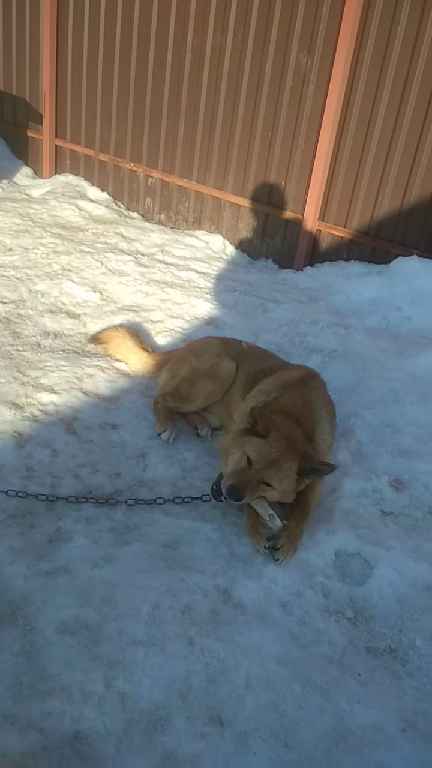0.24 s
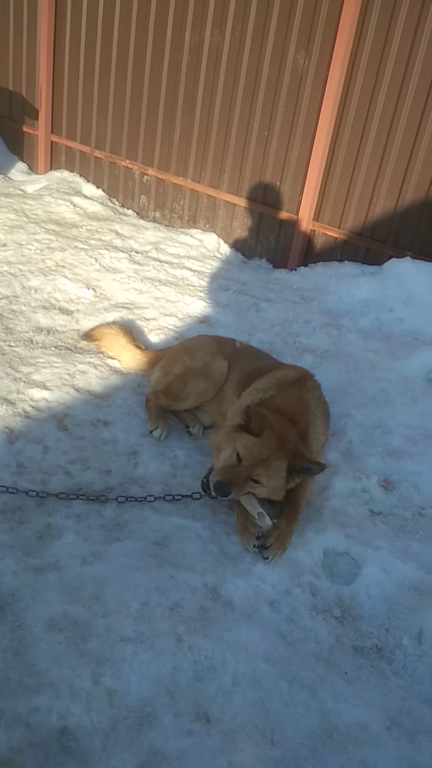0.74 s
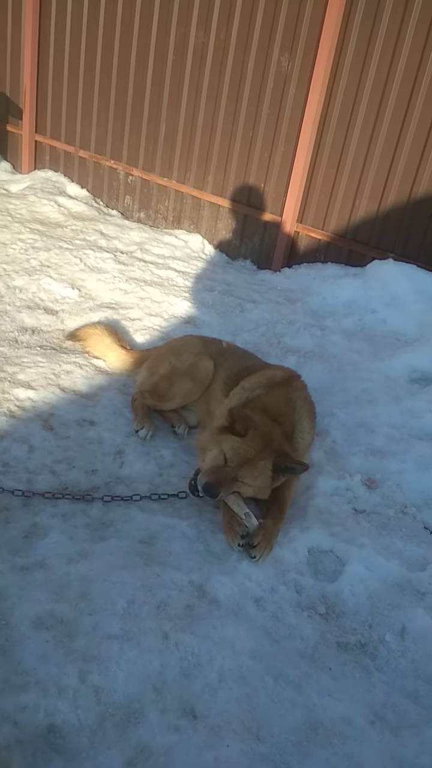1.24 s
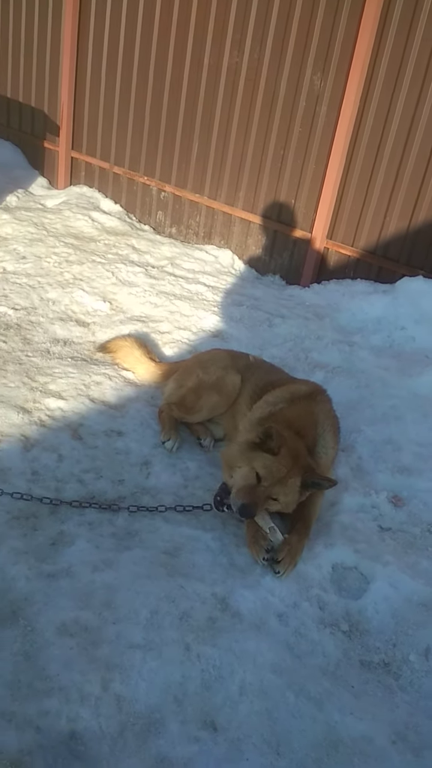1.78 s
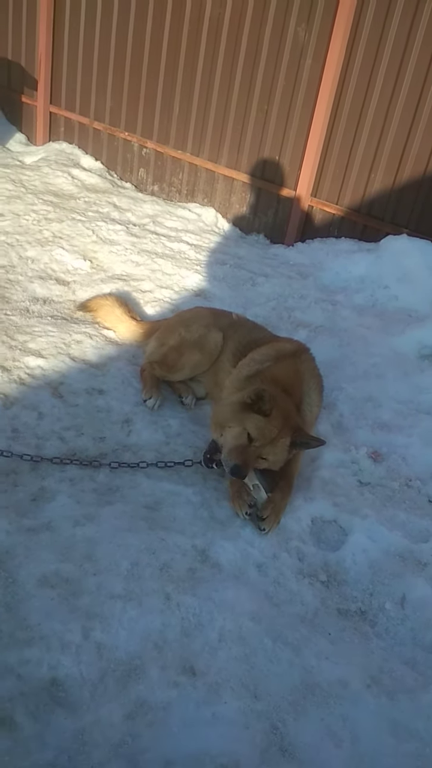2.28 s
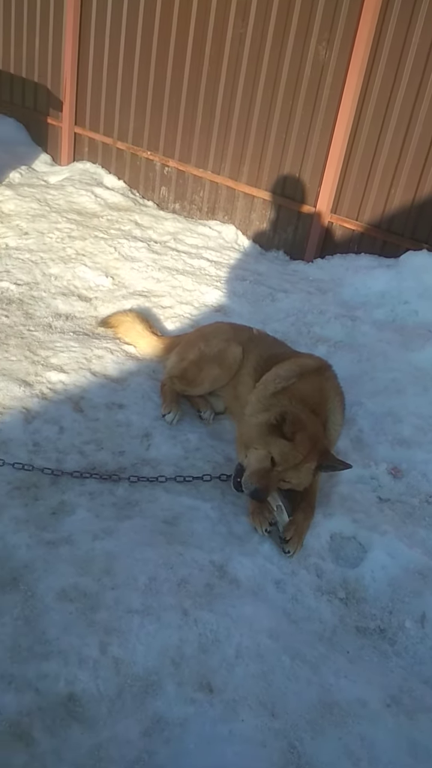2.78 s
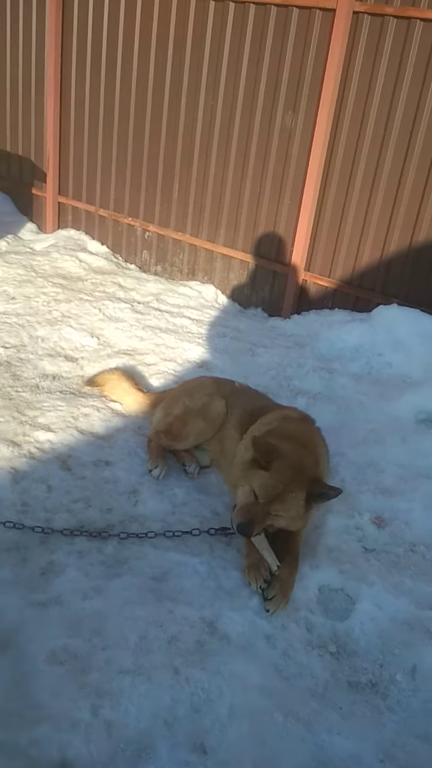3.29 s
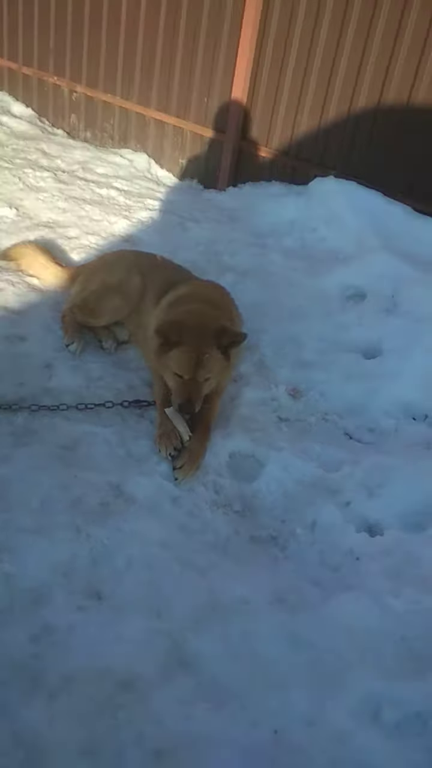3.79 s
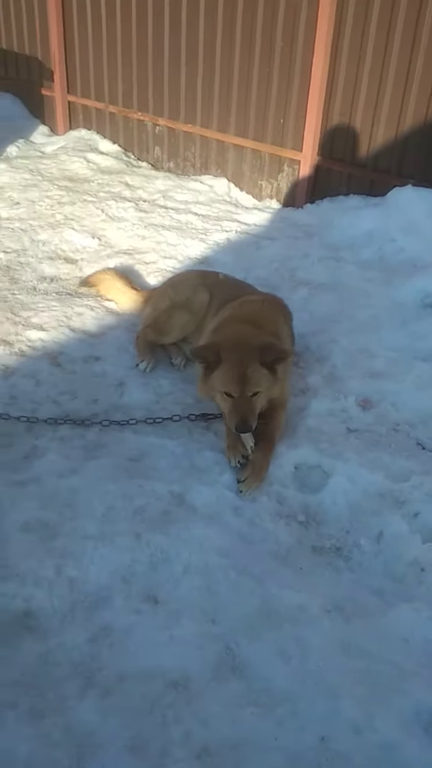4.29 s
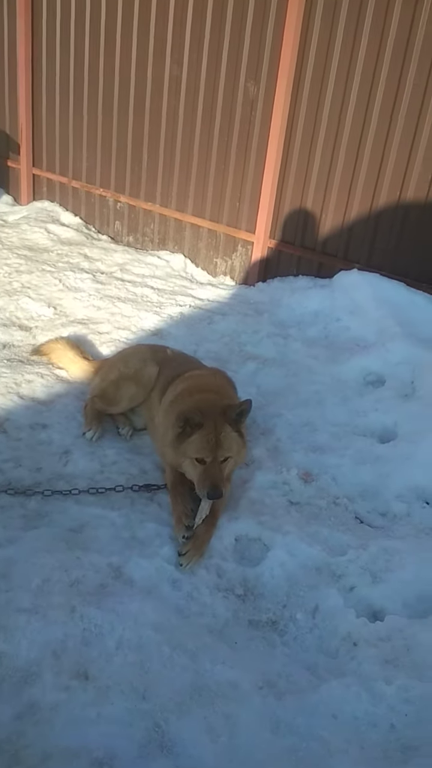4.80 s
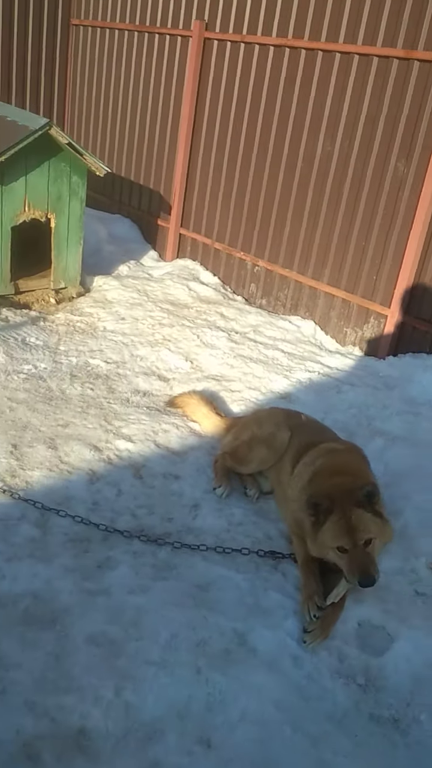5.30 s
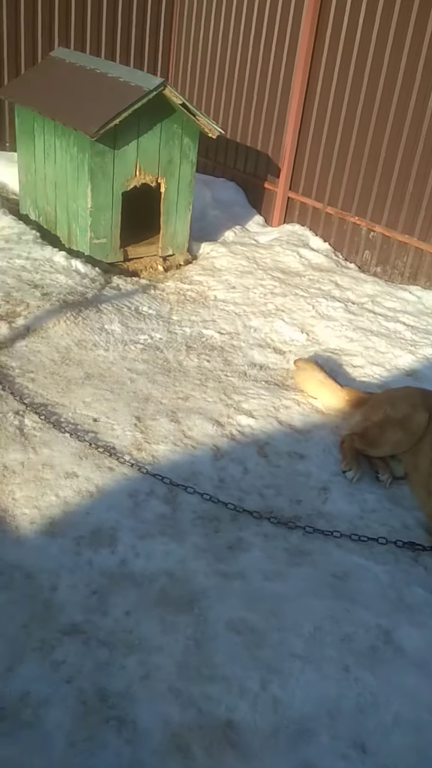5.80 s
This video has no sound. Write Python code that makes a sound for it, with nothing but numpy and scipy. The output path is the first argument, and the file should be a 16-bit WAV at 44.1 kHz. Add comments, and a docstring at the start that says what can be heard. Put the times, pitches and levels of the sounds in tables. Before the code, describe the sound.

In a quiet fenced snowy yard, a dog gnaws a bone: sparse dry knocks and tiny brittle cracks with a very short outdoor tail. Soft finger rubs accompany them. Midway, the hand-held phone is shifted, and loud scratchy rubbing, sharp clicks and dull thumps crowd the left channel. Clothes rustle, snow grinds faintly underfoot, and a strong bone knock comes near the end.

```python
"""Fenced yard, packed snow: a dog gnaws a bone, heard through a hand-held phone.
Knocks are short dying modes; splintering is bursts of tiny fractures that ring bright modes.
Fingers rub, judder and tick on the left microphone port: random grains shaped by stroke envelopes.
Clothes and snow rustle in coloured grains as the holder moves; air and handling rumble as low noise."""
import sys
import numpy as np
from scipy import signal
from scipy.fft import rfft, irfft
from scipy.io import wavfile
from scipy.ndimage import map_coordinates

SR = 44100
rng = np.random.default_rng(int(sys.argv[2]) if len(sys.argv) > 2 else 0)


def store_wav(level_fs):
    """Save 16-bit WAV to argv[1]."""
    pcm = np.round(np.clip(np.atleast_2d(level_fs), -1, 1) * 32767)
    wavfile.write(sys.argv[1], SR, pcm.T.astype(np.int16))


N = 266354
TIME = np.arange(N) / SR  # seconds
EDGE_HZ = 16100  # the phone's band limit

# Teeth, bone and jaws knock. Each row: start in seconds, left peak in dB, ring in Hz, T60 in seconds.
KNOCKS = [(0.373, -31, 463, 0.0042), (0.375, -40.5, 3280, 0.0073), (0.3756, -51, 266, 0.028),
          (0.378, -54, 887, 0.081), (0.982, -37.5, 790, 0.01), (0.9831, -42, 1060, 0.031),
          (0.9889, -36, 880, 0.003), (1.041, -42.5, 780, 0.0077), (1.823, -64.5, 817, 0.034),
          (1.986, -54, 800, 0.046), (2.002, -51.5, 753, 0.064), (2.4409, -42, 757, 0.013),
          (2.5502, -49, 1190, 0.025), (2.5501, -34.5, 736, 0.025), (4.087, -43.5, 750, 0.029),
          (4.163, -50.5, 657, 0.05), (4.334, -43, 486, 0.068), (5.09, -50, 450, 0.024),
          (5.9368, -29, 1580, 0.0073), (5.9365, -26, 547, 0.006), (5.9652, -36.5, 1410, 0.008)]
# Brittle crunches of bone. Each row: centre in seconds, level in dB, half length in seconds.
CRACKS = [(0.3732, -48, 0.00094), (0.86, -57.5, 0.0022), (0.9831, -34.5, 0.0013), (0.9899, -39.5, 0.0017),
          (1.985, -52, 0.0017), (2.552, -60.5, 0.013), (4.584, -49.5, 0.0091), (5.937, -36.5, 0.0016)]
# Modes a crunch rings with. Each row: frequency in Hz, relative level in dB, T60 in seconds.
SPLINTER_MODES = [(3580, 1, 0.032), (4320, -2, 0.017), (5800, 14, 0.0039), (7640, 14, 0.0018),
                  (10500, 29.5, 0.00063)]

# Strokes of a finger past the left port, slow slides and quick slips.
# Each row: peak in seconds, rise in seconds, fall in seconds, drag level in dB, hiss level in dB.
STROKES = [(0.015, 0.038, 0.026, -61.5, -77), (0.311, 0.01, 0.014, -50, -59.5),
           (0.69, 0.029, 0.025, -56, -60), (0.85, 0.017, 0.021, -50, -63), (1.17, 0.019, 0.021, -51, -54),
           (1.285, 0.034, 0.075, -51, -54), (1.39, 0.039, 0.036, -54, -55), (1.525, 0.022, 0.021, -52, -50),
           (2.09, 0.024, 0.022, -52.5, -63.5), (2.755, 0.003, 0.043, -62, -48),
           (2.82, 0.037, 0.14, -54, -52.5), (3.04, 0.035, 0.22, -60.5, -48.5),
           (3.255, 0.044, 0.045, -39.5, -29), (3.33, 0.031, 0.035, -41.5, -30.5),
           (3.52, 0.07, 0.045, -49.5, -48), (3.6, 0.098, 0.019, -45, -39), (3.7, 0.018, 0.053, -48, -45.5),
           (3.821, 0.004, 0.0049, -33, -37), (3.843, 0.0079, 0.0049, -32, -25.5),
           (3.87, 0.026, 0.03, -45, -44), (3.93, 0.0086, 0.0017, -41, -30), (3.96, 0.0033, 0.015, -37, -26),
           (3.99, 0.013, 0.028, -40, -35.5), (4.21, 0.065, 0.04, -55, -53),
           (4.33, 0.057, 0.036, -55.5, -46.5), (4.6, 0.11, 0.028, -70, -51),
           (4.755, 0.033, 0.015, -57, -50.5), (5.09, 0.22, 0.12, -80, -56.5),
           (5.165, 0.013, 0.02, -89, -50.5)]
# Skin judders over the rim of the port in a quick run of slips.
# Each row: centre in seconds, level in dB, half length in seconds, ring in Hz.
JUDDERS = [(1.175, -55, .012, 1090), (3.314, -43, .013, 1100), (3.773, -35.5, 0.0032, 13700),
           (3.821, -29, .006, 11500), (3.93, -36.5, .004, 1330), (3.963, -30, .005, 1900),
           (4.052, -38, .0013, 11300), (4.667, -48.5, .004, 1160), (4.668, -37.5, .005, 9500),
           (5.177, -43.5, .008, 12900), (5.336, -55, .01, 2880), (5.339, -42.5, .009, 12300)]
# Fingers catch and let go of the case. Each row: start in seconds, tick level in dB, relative thud in dB.
TICKS = [(1.5131, -36, -54), (3.1217, -21.5, -43), (3.6973, -10, -20), (3.739, -25, -51),
         (3.7468, -32, -50), (3.8473, -10, -11), (4.078, -21.5, -32.5), (4.1302, -13.5, -21),
         (4.6702, -19, -47), (4.936, -28.5, -50), (4.955, -32, -55), (5.3038, -25.5, -84),
         (5.442, -31.5, -77), (5.4563, -24.5, -68), (5.5096, -23, -42), (5.5423, -16, -33.5)]
# Stray creaks of the grip while the phone turns.
# One row: start in seconds, end in seconds, creaks per second, highest level in dB.
CREAKS = (4.45, 10, 37, -35)
# The pressed case thumps dully. Each row: start in seconds, level in dB, ring in Hz, T60 in seconds.
THUMPS = [(3.8193, -7.5, 222, 0.0084), (3.8482, -30, 325, 0.016)]
# The case scuffs in the palm. Each row: centre in seconds, level in dB, half length in seconds.
SCUFFS = [(3.547, -47.5, .11), (3.774, -56, 0.037), (3.995, -47.5, 0.054), (4.995, -59.5, 0.089)]

# Shifts of the holder's clothes and feet.
# Each row: peak in seconds, rise in seconds, fall in seconds, relative crunch in dB, hiss level in dB.
SHIFTS = [(0.87, 0.0098, 0.069, -74.5, -71.5), (1.04, 0.032, 0.16, -82, -66),
          (2.02, 0.038, 0.053, -90, -62.5), (2.45, 0.065, 0.14, -80, -66), (2.77, 0.082, 0.061, -96, -61),
          (3.13, 0.021, 0.041, -60, -61.5), (3.27, 0.071, 0.12, -76, -57), (3.64, 0.048, 0.095, -61, -58),
          (4.35, .07, 0.062, -58, -63), (4.59, 0.029, 0.086, -54, -53), (4.7, 0.02, .02, -72, -75),
          (4.75, 0.015, 0.017, -65, -50), (5.11, 0.062, 0.077, -64, -58),
          (5.51, 0.028, 0.033, -61.5, -56.5), (6.0, 0.088, 0.11, -64.5, -66)]
# Packed snow grinds under a foot. Each row: centre in seconds, level in dB, half length in seconds.
GRINDS = [(4.273, -63, 0.067), (4.707, -62, 0.025), (5.575, -51, .004), (5.596, -57, 0.0072),
          (5.684, -61.5, 0.13), (5.717, -58.5, 0.004), (5.736, -69, 0.003)]
# Strength of air and handling. Each row: time in seconds, level in dB.
RUMBLE = [(0, -72), (0.19, -71.5), (0.27, -54.5), (1, -62), (1.55, -59.5), (1.9, -65), (2.24, -64),
          (2.32, -54.5), (3.3, -59.5), (3.52, -49.5), (4.68, -56), (4.74, -47), (4.94, -41), (5.2, -58),
          (5.27, -51), (6.03, -51.5)]
# A faint hiss near 3 kHz. Each row: centre in seconds, half length in seconds, level in dB.
WHISPS = [(0.06, 0.13, -78.5), (2.534, 0.12, -75.5)]

# Spectrum of skin drag through the case. Each row: frequency in Hz, relative level in dB per Hz.
DRAG_SPECTRUM = [(80, -2.5), (220, -10), (400, 0.5), (750, -4.5), (1400, -9), (3100, -17.5), (7000, -33.5),
                 (16000, -48.5)]
# Spectrum of hiss in the port's resonance. Each row: frequency in Hz, relative level in dB per Hz.
PORT_HISS_SPECTRUM = [(1500, -20.5), (4700, -10), (8100, -5.5), (10700, 1), (13000, 0.5), (16000, -9.5)]
# Spectrum of crunching clothes and feet. Each row: frequency in Hz, relative level in dB per Hz.
CRUNCH_SPECTRUM = [(150, -6.5), (450, 5.5), (1500, 1), (2800, 0), (6000, -5), (16000, -67.5)]
# Spectrum of grinding snow. Each row: frequency in Hz, relative level in dB per Hz.
SNOW_SPECTRUM = [(700, -11), (1150, -8.5), (1400, 4), (1750, -0.5), (2200, -5), (3200, -10.5),
                 (8000, -13.5)]
# Spectrum of a scuff of the case. Each row: frequency in Hz, relative level in dB per Hz.
SCUFF_SPECTRUM = [(70, -25), (180, 5), (330, -0.5), (1200, -38)]
# Spectrum of low buffeting. Each row: frequency in Hz, relative level in dB per Hz.
BUFFET_SPECTRUM = [(8, -17.5), (28, 3.5), (50, -7.5), (78, 1), (105, -14), (132, -1.5), (175, -19),
                   (400, -30.5), (1500, -84.5)]
# Spectrum of the quiet yard. Each row: frequency in Hz, relative level in dB per Hz.
YARD_SPECTRUM = [(100, 32.5), (300, 15), (850, 21.5), (1400, 10.5), (2500, -13.5), (16000, -39.5)]


def knocks(undertone_db=-13, overtone_db=-17, chatter_gain=0.085, right_db=2):
    """A tooth slips off the bone; mouth or bone rings for a few cycles while the contact chatters on."""
    left, t = np.zeros(N), np.arange(SR // 8) / SR
    for s, peak_db, hz, t60_s in KNOCKS:
        note = ring(t, hz, t60_s)
        note += amp(overtone_db) * ring(t, 1.583 * hz, t60_s)
        note += amp(undertone_db) * ring(t, 0.66 * hz, t60_s)
        chatter = evened(bandpass(rng.standard_normal(len(t)), 0.5 * hz, hz))
        note += chatter_gain * chatter * np.exp(-2 * t / t60_s)
        note *= 1 - np.exp(-t * hz)  # builds over about one cycle
        add(left, s, amp(peak_db) * note / abs(note).max())
    return left * amp([[0], [right_db]])


def cracks(left_db=-2, raw_gain=0.02, crumble_db=-15, crumble_s=0.035, fractures_per_s=9000):
    """Clusters of fractures ring short, bright modes; after each break the bone crumbles on for a moment."""
    force = np.zeros(N)
    for s, db, half_s in CRACKS:
        crumble = (TIME > s) * np.exp(-abs(TIME - s) / crumble_s)
        force += amp(db) * (swell(s, half_s) + amp(crumble_db) * crumble)
    t = np.arange(SR // 40) / SR
    body = sum(amp(db) * ring(t, hz, t60_s) for hz, db, t60_s in SPLINTER_MODES)
    body = body / np.linalg.norm(body) + raw_gain * (t == 0)  # some fracture passes unrung
    ports = [signal.oaconvolve(force * grains(fractures_per_s, 1.2), body)[:N] for _ in range(2)]
    return np.array(ports) * amp([[left_db], [0]])


def yard_tail(x, t60_s=0.35, wet_db=-17.02, dull_hz=1400, bright_db=-2, bright_t60_s=0.028):
    """Fence and snow scatter a short tail whose treble dies first."""
    t = np.arange(SR // 2) / SR
    echoes = rng.standard_normal((2, len(t))) * (rng.random((2, len(t))) < 0.06)  # sparse
    echoes *= t > 0.006
    dull = signal.lfilter(*signal.butter(2, dull_hz, fs=SR), echoes * amp(-60 * t / t60_s))
    tail = dull + amp(bright_db) * echoes * amp(-60 * t / bright_t60_s)
    tail /= np.linalg.norm(tail, axis=1, keepdims=True)
    return x + amp(wet_db) * signal.fftconvolve(x, tail, axes=1)[:, :N]


def rubbing(drag_gain_db=1, press_db=-3, press_hz=320, rasp_db=-9, rasp_hz=1700, leak_db=-35,
            grip_s=5.72, grip_fade_s=0.086, grip_db=-56.5, clump_hz=90, clump_db=3):
    """Stick-slip of skin: a dull drag through the case and a hiss in the port's own resonance."""
    drag, hiss = strokes(STROKES, release=1.19)
    # from grip_s on, the fingers hold the turning phone and creep steadily
    grip = amp(grip_db) * onward(grip_s, grip_fade_s) * flutter(4.8, 1.0)
    hiss = np.hypot(hiss, grip)
    hardness = drag / drag.max()
    # only the hardest drags pump air into the port as a low flutter
    pumped = evened(bandpass(rng.standard_normal(N), press_hz / 2, press_hz))
    press = amp(press_db) * drag * hardness * pumped
    # the harder the drag, the more it rasps
    coarse = evened(bandpass(grains(2500, 2.1), rasp_hz / np.sqrt(2), rasp_hz * np.sqrt(2), order=1))
    rasp = amp(rasp_db) * drag * np.sqrt(hardness) * coarse
    # skin sticks and gives way in clumps, deepest under the hardest drag
    clumps = flutter(clump_hz, clump_db) ** np.sqrt(hardness)
    dull = drag * patchy(colour(grains(6000, 2.1), DRAG_SPECTRUM))
    bright = hiss * patchy(colour(grains(14000, 3.3), PORT_HISS_SPECTRUM))
    rub = (amp(drag_gain_db) * dull + rasp) * clumps + bright + press
    return at_left_port(rub * flutter(33, 1.16), leak_db)


def judders(slips_per_s=520, slip_decay_s=0.00095, spread_db=3, leak_db=-30):
    """Uneven slips, each a tiny scratch, ring a broad resonance of finger and port."""
    left = np.zeros(N)
    for s, db, half_s, hz in JUDDERS:
        t = np.arange(-3 * half_s, 3 * half_s, 1 / SR)
        rate = slips_per_s * rng.exponential(1, len(t)).repeat(32)[:len(t)]  # new every 32 samples
        slip_count = np.cumsum(rate) / SR // 1
        slips = amp(spread_db * rng.standard_normal(len(t))) * (np.diff(slip_count, prepend=-1) > 0)
        decay = np.exp(-1 / (slip_decay_s * SR))
        scratch = signal.lfilter([1], [1, -decay], slips) * rng.standard_normal(len(t))
        rung = evened(bandpass(scratch, hz / 1.33, min(hz * 1.33, EDGE_HZ)))
        add(left, s + t[0], amp(db) * np.exp(-0.5 * (t / half_s) ** 2) * rung)
    return at_left_port(left, leak_db)


def ticks(port_hz=10800, port_t60_s=0.0007, thud_s=0.0011, soft_s=0.0001, thud_gain_db=6,
          leak_db=-30, fray_db=-29, fray_s=0.0012):
    """Each release snaps the port resonance amid smaller catches and pushes one soft pulse through the case."""
    left, t = np.zeros(N), np.arange(SR // 50) / SR
    thud = (1 - t / thud_s) * np.exp(-t / thud_s) * (1 - np.exp(-t / soft_s))

    def snap(hz):
        """The port's dying mode, differenced, at peak 1."""
        edge = np.diff(ring(t, hz, port_t60_s), prepend=0)
        return edge / abs(edge).max()

    detunes = rng.uniform(0.88, 1.05, len(TICKS))
    for (s, tick_db, thud_db), detune in zip(TICKS, detunes):
        tick = amp(tick_db) * snap(port_hz * detune)
        add(left, s, tick - amp(thud_db + thud_gain_db) * thud)
    near_ticks = sum(amp(db) * np.exp(-abs(TIME - s) / fray_s) for s, db, _ in TICKS)
    fray = amp(fray_db) * near_ticks * grains(5000, 2.4)
    start_s, end_s, per_s, creak_db = CREAKS
    creaks = amp(creak_db - 10 * rng.random(N)) * (rng.random(N) < per_s / SR)
    creaks *= (TIME > start_s) & (TIME < end_s)
    left += signal.oaconvolve(fray + creaks, snap(port_hz))[:N]
    return at_left_port(left, leak_db)


def handling(leak_db=-28):
    """Dull dying modes and muffled grains: thumps and scuffs of the case, mostly at the left port."""
    scuffing = sum(amp(db) * swell(s, half_s) for s, db, half_s in SCUFFS)
    left = scuffing * colour(grains(900, 0.96), SCUFF_SPECTRUM)
    for s, db, hz, t60_s in THUMPS:
        add(left, s, amp(db) * ring(TIME[:SR // 20], hz, t60_s))
    return at_left_port(left, leak_db)


def rustle(crunch_gain_db=-2, turn_s=3.1, turn_fade_s=0.052, turn_crunch_db=-85.5, turn_hiss_db=-72,
           turn_db_per_s=3):
    """Grainy rustle of clothes and feet, partly the same grains at both ports."""
    crunch, hiss = strokes(SHIFTS, release=1.52)
    # from turn_s on, the holder turns and the clothes rustle without a break, growing
    turn = onward(turn_s, turn_fade_s) * amp(turn_db_per_s * (TIME - turn_s)) * flutter(0.69, 0.82)
    crunch = amp(crunch_gain_db) * np.hypot(crunch, amp(turn_crunch_db) * turn)
    hiss = np.hypot(hiss, amp(turn_hiss_db) * turn)
    shared = grains(2000, 1.2)

    def grit(spectrum):
        """Shared and separate grains, coloured and made uneven."""
        grainy = colour(shared + grains(3000, 10.0), spectrum)
        return patchy(grainy, depth_db=4.5, wide_hz=700, long_s=0.04)

    ports = [crunch * grit(CRUNCH_SPECTRUM) + hiss * grit(PORT_HISS_SPECTRUM) for _ in range(2)]
    return np.array(ports) * flutter(110, 2)


def snow():
    """Packed snow grinds in clumps of grains under a shifting foot."""
    grind = sum(amp(db) * swell(s, half_s) for s, db, half_s in GRINDS)
    ports = np.array([colour(grains(4000, 1.0), SNOW_SPECTRUM) for _ in range(2)])
    return grind * ports * flutter(130, 4.4)


def turning(x):
    """As the phone turns, the sound comes to reach the right port later than the left."""
    lag_s = np.interp(TIME, [3, 5.5], [0, 0.0004])
    right = map_coordinates(x[1], [(TIME - lag_s) * SR], order=3)
    return np.array([x[0], right])


def air(apart=0.21, yard_db=-77, floor_db=-95):
    """Lumpy low buffeting, nearly alike at both ports, over the quiet yard and the microphones' own hiss."""
    def pair():
        """Noise mostly shared by the two ports."""
        return rng.standard_normal(N) + apart * rng.standard_normal((2, N))

    strength = amp(np.interp(TIME, *np.transpose(RUMBLE)))
    buffet = strength * flutter(37.0, 0.17) * colour(pair(), BUFFET_SPECTRUM)
    quiet_yard = amp(yard_db) * colour(pair(), YARD_SPECTRUM)
    return buffet + quiet_yard + amp(floor_db) * rng.standard_normal((2, N))


def whisps(low_hz=2800, high_hz=3300):
    """A faint narrow band of hiss swells and fades."""
    band = evened(bandpass(rng.standard_normal((2, N)), low_hz, high_hz, order=3))
    return sum(amp(db) * swell(s, half_s) for s, half_s, db in WHISPS) * band


def amp(db):
    """Decibels to gain."""
    return 10 ** (np.asarray(db) / 20)


def evened(x):
    """Scales to rms 1."""
    return x / np.sqrt(np.mean(x ** 2) + 1e-20)


def bandpass(x, low_hz, high_hz, order=2):
    """Keeps one band of x."""
    return signal.lfilter(*signal.butter(order, [low_hz, high_hz], "band", fs=SR), x)


def colour(x, points):
    """Filters x by a spectrum, to rms 1."""
    hz, db = np.transpose(points)
    bins_hz = np.fft.rfftfreq(N, 1 / SR)
    shape = amp(np.interp(np.log(bins_hz + 1), np.log(hz), db))
    return evened(irfft(rfft(x) * shape, N))


def add(mix, s, sound):
    """Lays a sound into the mix at time s."""
    part = mix[..., max(round(s * SR), 0):][..., :sound.shape[-1]]
    part += sound[..., :part.shape[-1]]


def at_left_port(x, leak_db):
    """Sound at the left port, with a leak into the right."""
    return x * amp([[0], [leak_db]])


def flutter(hz, depth_db):
    """A gain that wanders at random, up to about hz times a second."""
    return amp(depth_db * colour(rng.standard_normal(N), [(hz, 0), (2 * hz, -40)]))


def grains(per_s, spread_db):
    """Tiny random slips of either sign, a few larger than the rest."""
    size = amp(spread_db * np.minimum(rng.exponential(1, N), 4))
    return evened(size * rng.choice([-1, 1], N) * (rng.random(N) < per_s / SR))


def ring(t, hz, t60_s):
    """One dying mode."""
    return np.sin(2 * np.pi * hz * t) * np.exp(-np.log(1000) * t / t60_s)


def swell(s, half_s):
    """A smooth bell-shaped bump around time s."""
    return np.exp(-0.5 * ((TIME - s) / half_s) ** 2)


def onward(s, fade_s):
    """Fades in up to time s and stays."""
    return np.where(TIME < s, swell(s, fade_s), 1)


def stroke(s, rise_s, fall_s, release):
    """A sliding contact takes hold, peaks at s and lets go; release 1 trails off, 2 ends like a bell curve."""
    falling = np.exp(-0.5 * abs((TIME - s) / fall_s) ** release)
    return np.where(TIME < s, swell(s, rise_s), falling)


def strokes(rows, release):
    """Overlapping strokes add in power: a gain curve for each of their two levels."""
    power = np.array([stroke(s, rise_s, fall_s, release) ** 2 for s, rise_s, fall_s, *_ in rows])
    weights = np.array([amp(levels_db) ** 2 for _, _, _, *levels_db in rows])
    return np.sqrt(weights.T @ power)


def patchy(x, depth_db=2.8, wide_hz=600, long_s=0.035, frame=512):
    """Uneven noise: random patches of the spectrum grow louder and softer."""
    z = signal.stft(x, nperseg=frame)[2]
    across = np.fft.fftfreq(len(z), SR / frame)[:, None]
    along = np.fft.fftfreq(z.shape[1], frame / 2 / SR)
    blur = np.exp(-(across * wide_hz) ** 2 - (along * long_s) ** 2)
    patches = evened(np.fft.ifft2(np.fft.fft2(rng.standard_normal(z.shape)) * blur).real)
    return evened(signal.istft(z * amp(depth_db * patches), nperseg=frame)[1][:N])


def scene():
    """Dog, holder's movements, fingers on the phone, then the background."""
    bone = yard_tail(knocks() + cracks())
    around = turning(bone + rustle() + snow())
    fingers = rubbing() + judders() + ticks() + handling()
    return around + fingers + air() + whisps()


def record(dry):
    """The phone's band limit: a steep low-pass."""
    lowpass = signal.firwin(511, EDGE_HZ, window=("kaiser", 9), fs=SR)
    return signal.oaconvolve(dry, lowpass[None], "same")


dry = scene()
out = record(dry)
store_wav(out)
```